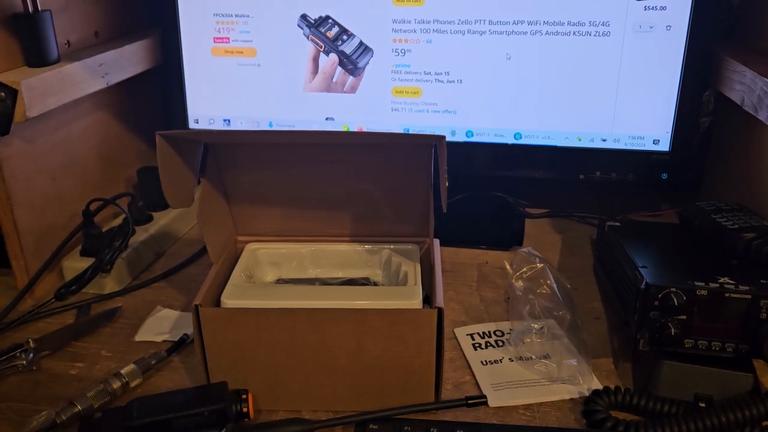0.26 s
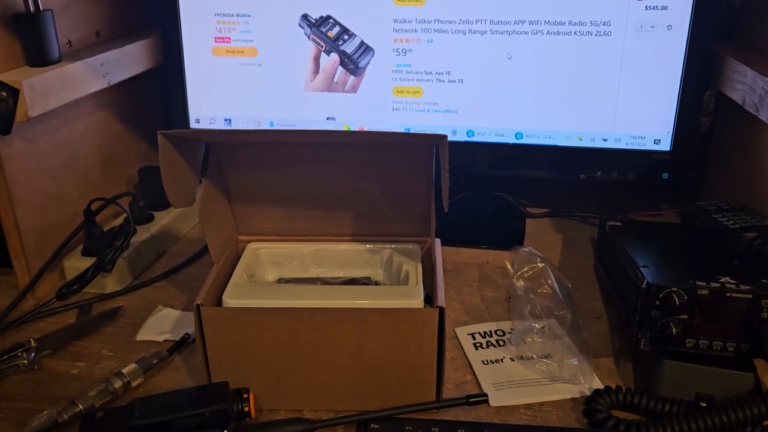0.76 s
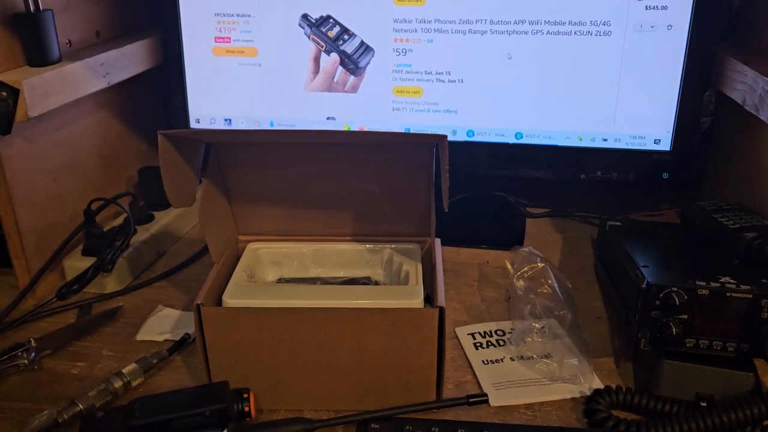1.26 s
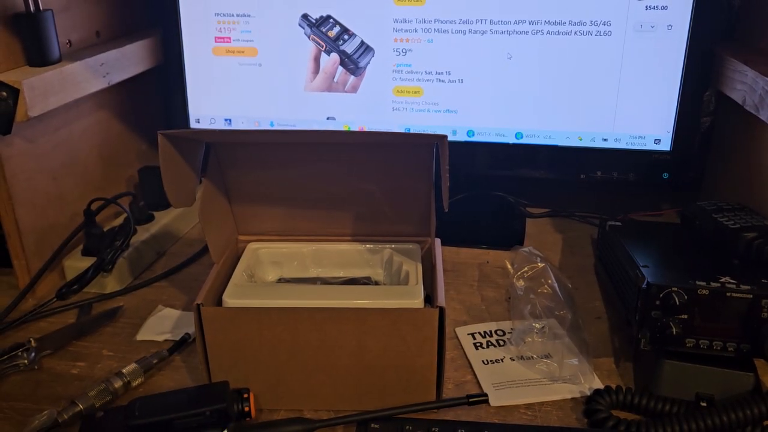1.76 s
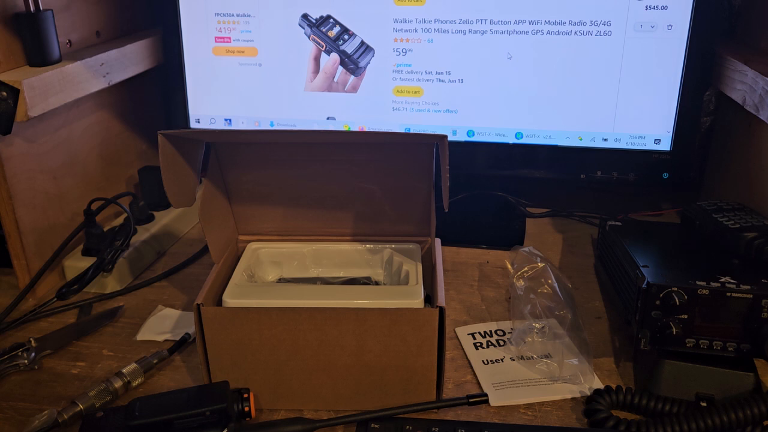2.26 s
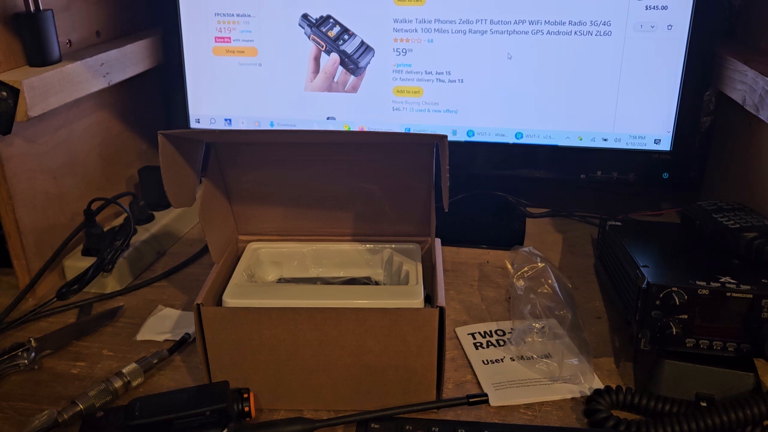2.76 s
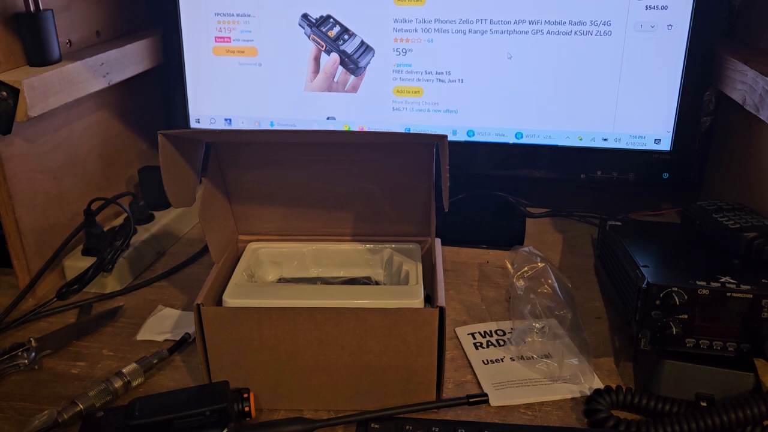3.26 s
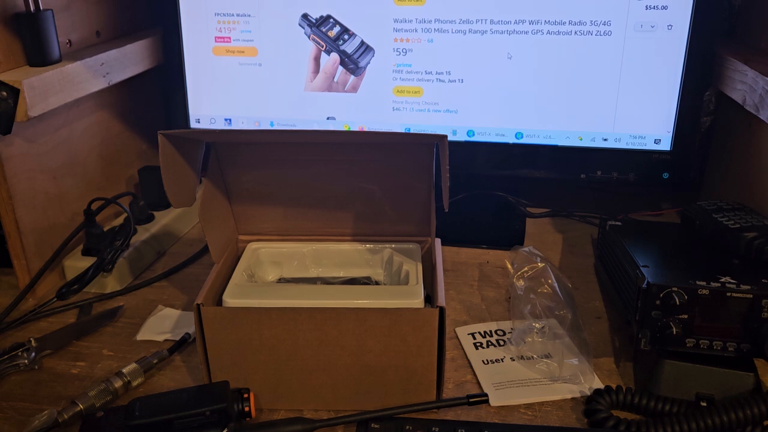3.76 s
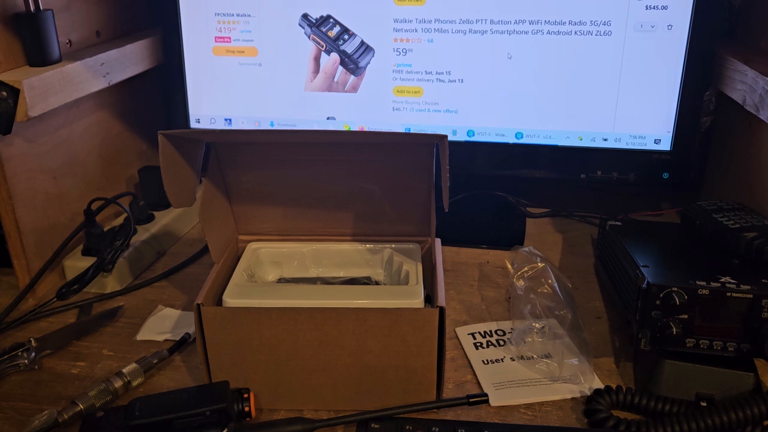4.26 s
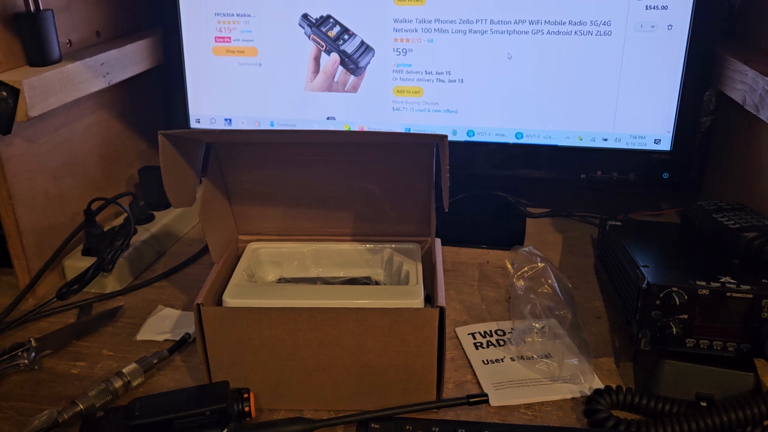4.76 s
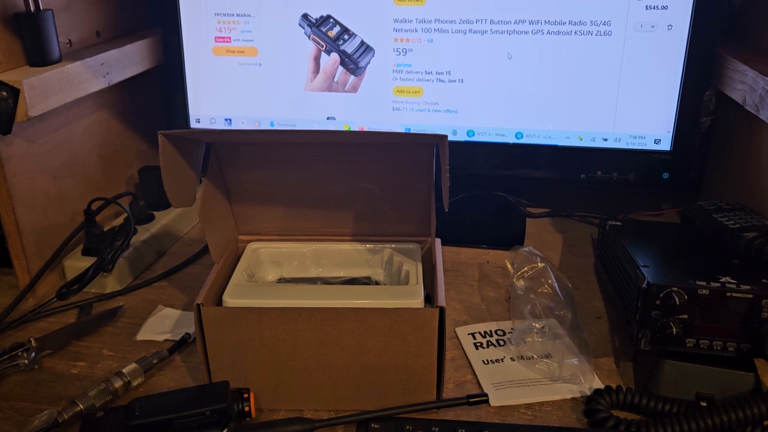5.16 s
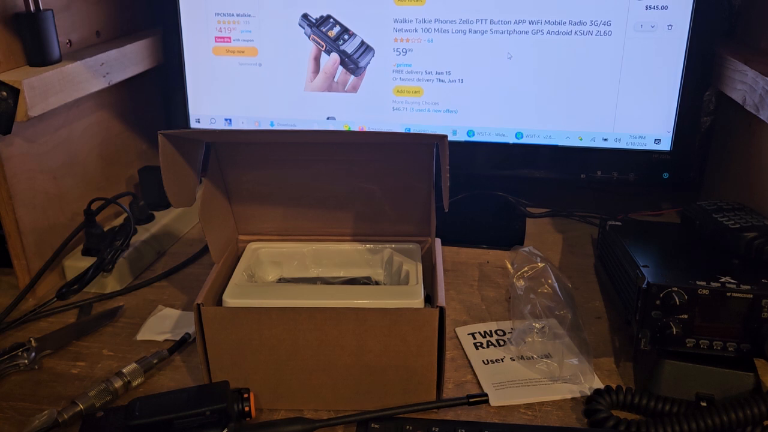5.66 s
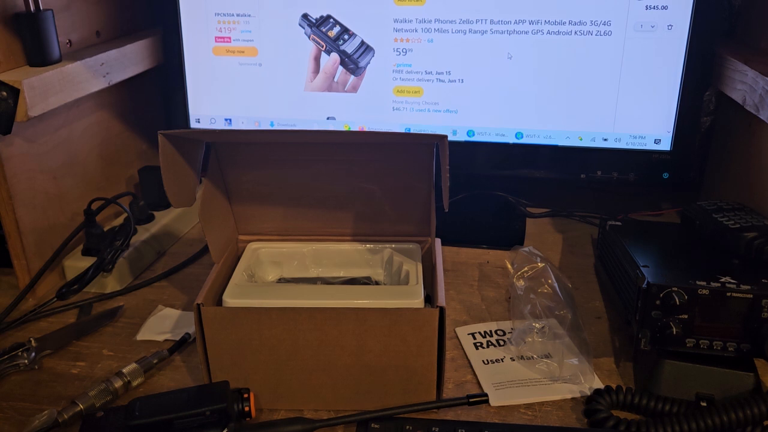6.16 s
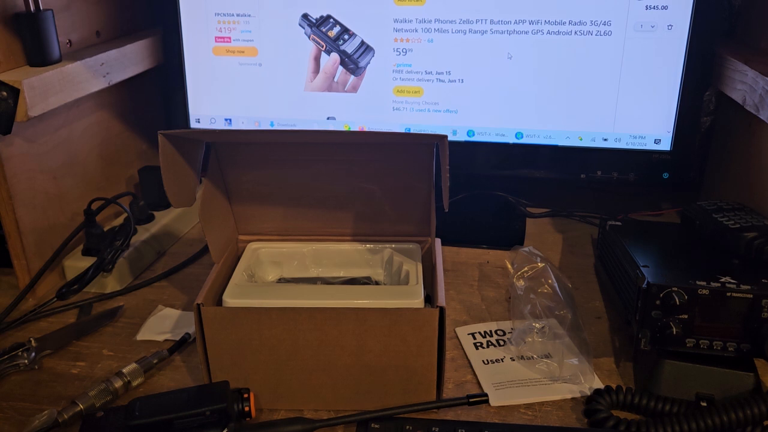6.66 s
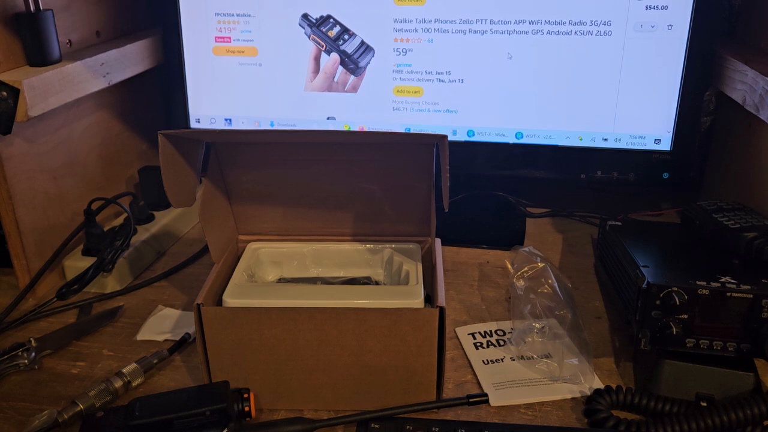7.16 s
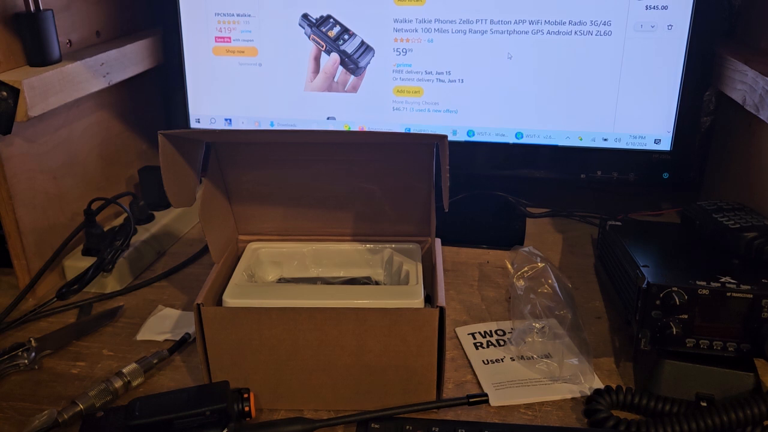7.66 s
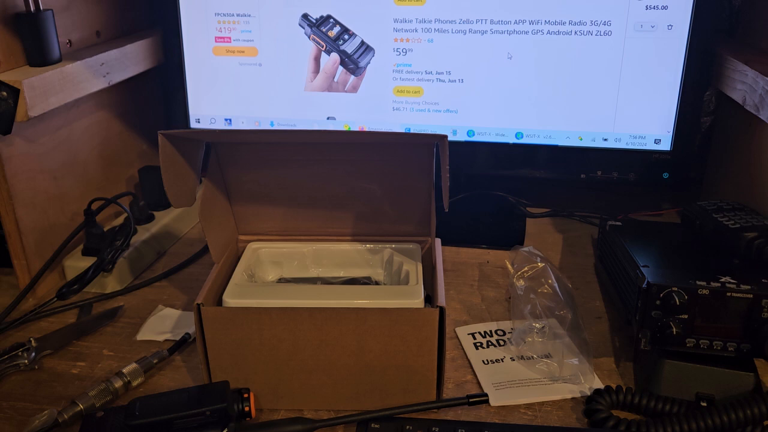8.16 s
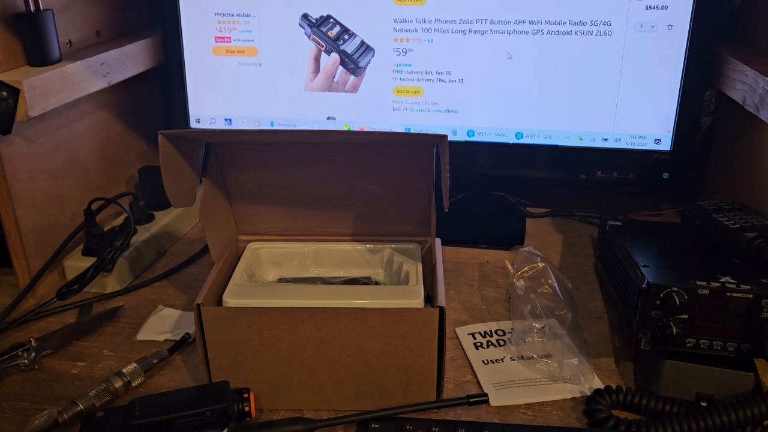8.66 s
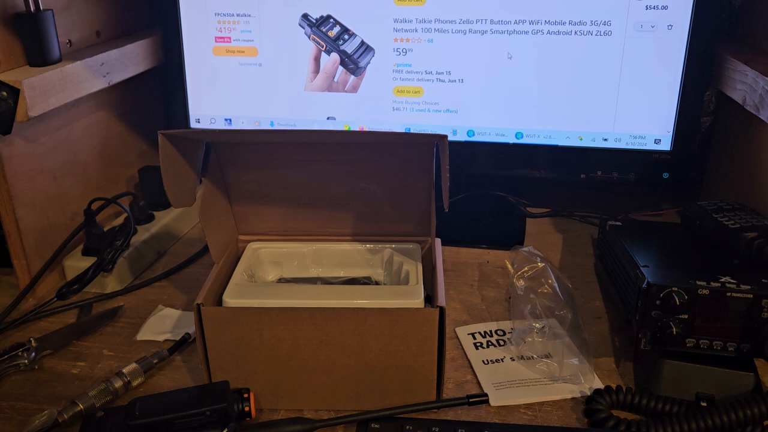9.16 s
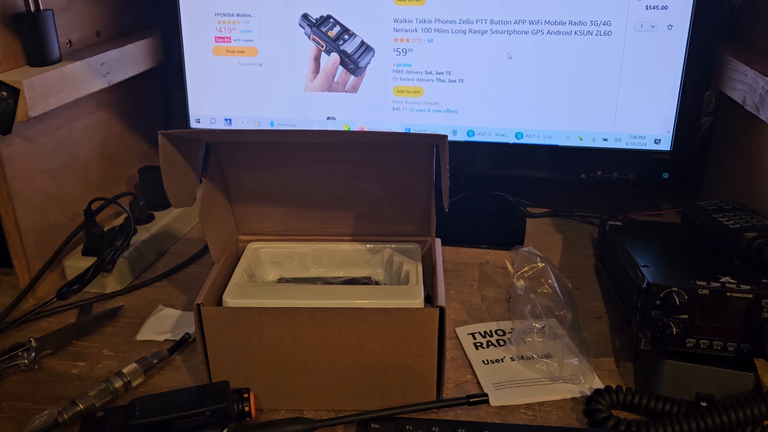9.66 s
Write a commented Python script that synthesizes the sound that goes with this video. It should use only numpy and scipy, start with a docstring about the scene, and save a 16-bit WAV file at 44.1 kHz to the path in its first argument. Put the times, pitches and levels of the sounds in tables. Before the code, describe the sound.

Quiet indoor desk ambience: deep fan drone, faint blade whine and rushing air, broken by a tiny early snap with quick rebounds and barely audible ticks.

```python
"""A quiet small room with a computer running, heard at two microphone ports over the desk.
Throughout, two unbalanced fans and a transformer hum through the furniture, blades whine, coils whistle
faintly, and turbulent air excites the room's resonances and thins out into hiss.
Near the start a small part snaps and rebounds, as a fast-rising noise burst with ringing modes.
A faint tick follows, then a soft rustle of swelling noise, and near the end another tick."""
import sys
import numpy as np
from scipy import signal
from scipy.fft import rfft, irfft
from scipy.io import wavfile

SR = 44100
rng = np.random.default_rng(int(sys.argv[2]) if len(sys.argv) > 2 else 0)


def to_wav(s):
    """Save 16-bit WAV."""
    ch = np.atleast_2d(s).T  # columns
    pcm = np.round(np.clip(ch, -1, 1) * 32767)  # PCM
    wavfile.write(sys.argv[1], SR, pcm.astype(np.int16))


N = 437472

# Pan is left minus right throughout.
# Whistle of the power supply's coils: frequency_hz, level_db, pan_db
COIL_TONES = [(6364, -87, 7), (6380, -90, -6)]
# Clicks nearby, a snap with its rebounds and two later ticks: start_s, level_db, brightness_db_per_octave
CLICK_EVENTS = [(0.3245, -38, -1), (0.3328, -47, -3), (0.367, -52, -4), (0.42, -48, -4), (1.318, -64, 14),
                (9.366, -58, 2)]
# Relative spectrum of a contact sound: frequency_hz, density_db_per_hz
CONTACT_SPECTRUM = [(300, -9), (1500, 1.5), (2500, -4.5), (3300, -0.5), (4300, 1), (7500, -9.5),
                    (12000, -14), (15500, -20)]
# Modes of the snapping part, relative to the click: frequency_hz, level_db
SNAP_MODES = [(1420, -15), (3180, -14), (3850, -14), (4500, -13), (5350, -16)]
# Seven blades and motor of the fast fan: multiple_of_turning_rate, level_db, pan_db
BLADE_TONES = [(7, -56.5, 1.5), (14, -63.5, -0.5), (17, -76.5, 13), (20, -80.5, 5), (22, -75, 12),
               (24, -79.5, 15), (25, -77, 3), (28, -84, 2), (29, -78, 18)]
# Rush of the fans' air, before the resonances: frequency_hz, density_db_per_hz
AIR_SPECTRUM = [(10, -100), (30, -77), (55, -68.5), (85, -78), (130, -74), (280, -78), (520, -84),
                (800, -85.5), (1000, -86), (1500, -89), (2600, -93.5), (4000, -95.5), (6000, -100.5),
                (15500, -118.5)]
# Resonances of room, desk and case that lift the rush: frequency_hz, width_hz, lift_db
ROOM_RESONANCES = [(140, 11, 1), (165.3, 19, 8), (184.6, 8, 3.5), (228, 13, 5), (312.3, 25.6, 7.5),
                   (340, 16, 7.5), (369.7, 26, 8), (404, 19, 8.5), (457, 42, 6), (535, 31, 3),
                   (610, 23, 4.5), (679, 46, 5.5), (774, 136, 4), (1268, 80, 5.5), (1450, 116, 4),
                   (2172, 205, 4.5), (3070, 250, 3), (3490, 200, 2)]
# Likeness of the rush at the two ports: frequency_hz, correlation
PORT_CORRELATION = [(100, 0.94), (350, 0.92), (480, 0.77), (700, 0.38), (1200, 0.14), (2200, 0.23),
                    (4000, -0.1), (12000, -0.013)]
# Balance of the rush between the ports: frequency_hz, pan_db
AIR_PAN = [(60, -1.5), (110, -2), (200, 4), (380, -0.5), (700, 1), (1290, 2), (2380, 2), (4400, 1.5),
           (8120, 0), (15000, -3.5)]
# Fast fan's shaft shaking the case: multiple_of_turning_rate, level_db
FAST_SHAFT_LINES = [(1, -35.5)]
# Slow fan with four blades: multiple_of_turning_rate, level_db
SLOW_FAN_LINES = [(1, -43), (2, -53.5), (4, -48), (8, -65), (16, -70)]
# Transformer hum: multiple_of_mains_rate, level_db
TRANSFORMER_LINES = [(4, -59.5)]
# Cavities of the microphone ports: frequency_hz, width_hz, gain_db
PORT_CAVITIES = [(7750, 1660, 5), (9700, 940, -9), (12100, 1540, 6)]

FAST_HZ, SLOW_HZ, MAINS_HZ = 57.9, 27.07, 60
HUM_PAN_DB, HUM_LAG_RAD = .85, .13  # left minus right, lag of the left port
AIR_SWELL_DB_PER_S = 0.07
CLICK_ATTACK_S, CLICK_T60_S, RING_T60_S = 0.0005, 0.066, .075
RUSTLE_CENTRE_S, RUSTLE_SIGMA_S = 4.705, .03
RUSTLE_DB, RUSTLE_TILT_DB_PER_OCTAVE = -64, 5
TOP_HZ = 15700
TIME = np.arange(N) / SR  # seconds
BINS = np.maximum(np.arange(N // 2 + 1) * SR / N, 1)  # Hz
LEFT_RIGHT = np.array([[.5], [-.5]])  # splits a difference evenly between the ports


def undb(db):
    """Amplitude is an exponential function of level in decibels."""
    return 10 ** (np.asarray(db) / 20)


def curve(points):
    """Spectral values are interpolated linearly on a log-frequency axis."""
    hz, value = np.transpose(points)
    return np.interp(np.log(BINS), np.log(hz), value)


def bells(rows):
    """Resonances and dips superpose in dB, each a Gaussian with its full width at half height."""
    return sum(db * .5 ** ((2 * (BINS - hz) / width) ** 2) for hz, width, db in rows)


def colour(x, db):
    """Linear filtering multiplies the spectrum by a gain at every frequency."""
    return irfft(rfft(x) * undb(db), N)


def walk(rate):
    """Low-passed noise wanders smoothly, with unit spread and about rate turns a second."""
    spectrum = rfft(rng.standard_normal(N))
    x = irfft(spectrum / (1 + (BINS / rate) ** 2) ** 2, N)
    return (x - x.mean()) / x.std()


def decay(age, t60):
    """Exponential decay loses 60 dB in t60 seconds."""
    return np.exp(-np.log(1000) * age / t60)


def rotation(hz, wander, rate):
    """A shaft's angle is the integral of its speed, which drifts by a small share at rate knots a second."""
    knots = rng.standard_normal(int(N / SR * rate) + 2)
    drift = np.interp(TIME * rate, np.arange(len(knots)), knots)
    return 2 * np.pi * np.cumsum(hz * (1 + wander * drift)) / SR


def tone(angle, multiple, db, port_phase=0):
    """A harmonic is phase-locked to its source; port_phase is the left port's lag in radians."""
    start_phase = rng.uniform(0, 2 * np.pi)
    amplitude = np.sqrt(2) * undb(db)  # db is an rms level
    return amplitude * np.sin(multiple * angle + start_phase - port_phase * LEFT_RIGHT)


def reflections(x, count=12):
    """Delayed copies interfere: desk, screen and shelves comb short waves differently at each port."""
    lag_s = rng.uniform(.001, .014, (count, 2, 1))
    share = .22 / (1 + (700 / BINS) ** 4)  # grows with frequency
    echoes = sum(np.exp(-2j * np.pi * BINS * lag) for lag in lag_s) / np.sqrt(count)
    return irfft(rfft(x) * (1 + share * echoes) / np.sqrt(1 + share ** 2), N)


def scatter(brightness_db):
    """Scattering from things on the desk decorrelates a contact's noise at the two ports, at unit level."""
    tilt_db = brightness_db * np.log2(1 + BINS / 1000)
    x = colour(rng.standard_normal((2, N)), curve(CONTACT_SPECTRUM) + tilt_db)
    return x / x.std()


def coils():
    """Steady oscillation of the power supply's coils radiates very faint high tones."""
    return sum(tone(2 * np.pi * hz * TIME, 1, db + pan_db * LEFT_RIGHT)
               for hz, db, pan_db in COIL_TONES)


def rustle():
    """High crinkling, perhaps plastic wrapping settling, is noise under a Gaussian envelope."""
    swell = np.exp(-.5 * ((TIME - RUSTLE_CENTRE_S) / RUSTLE_SIGMA_S) ** 2)
    return undb(RUSTLE_DB) * swell * scatter(RUSTLE_TILT_DB_PER_OCTAVE)


def clicks(room_db=-13, room_t60=0.29, pan_db=3.0):
    """An impact excites damped modes and a noise burst, which leaves a short reverberant tail."""
    out = 0
    for start_s, db, brightness_db in CLICK_EVENTS:
        age = np.maximum(TIME - start_s, 0)
        rise = 1 - np.exp(-age / CLICK_ATTACK_S)
        direct = decay(age, CLICK_T60_S)
        tail = undb(room_db) * decay(age, room_t60)
        burst = np.hypot(direct, tail) * scatter(brightness_db)
        modes = sum(tone(2 * np.pi * hz * age, 1, mode_db) for hz, mode_db in SNAP_MODES)
        ring = modes * decay(age, RING_T60_S)
        out = out + undb(db) * rise * (burst + ring)
    return out * undb(pan_db * LEFT_RIGHT)


def whine(flutter_db=2):
    """Blades cutting uneven air radiate harmonics of the turning rate, fluttering in pitch and strength."""
    angle = rotation(FAST_HZ, wander=.0016, rate=20)
    return sum(tone(angle, multiple, db + flutter_db * walk(10.5)) * undb(pan_db * LEFT_RIGHT)
               for multiple, db, pan_db in BLADE_TONES)


def rush():
    """Turbulence excites room resonances; its field is coherent at the ports in the bass, diffuse above."""
    mid, side = rfft(rng.standard_normal((2, N)))
    alike = np.clip(curve(PORT_CORRELATION), -.999, .999)
    # Mid and side weights set the correlation while each port keeps unit power.
    common = mid * np.sqrt((1 + alike) / 2)
    opposed = 2 * LEFT_RIGHT * side * np.sqrt((1 - alike) / 2)
    air = irfft(common + opposed, N) * np.sqrt(SR / 2)  # unit power per Hz
    db = curve(AIR_SPECTRUM) + bells(ROOM_RESONANCES) + curve(AIR_PAN) * LEFT_RIGHT
    swell_db = AIR_SWELL_DB_PER_S * (TIME - TIME.mean())
    return reflections(colour(air, db)) * undb(swell_db)


def hum(sway_db=0.36):
    """Forced vibration of the desk radiates long waves, nearly alike at both ports; close lines beat."""
    fast = rotation(FAST_HZ, wander=0.00029, rate=0.79)
    slow = rotation(SLOW_HZ, wander=0.00065, rate=0.99)
    mains = 2 * np.pi * MAINS_HZ * TIME
    parts = [(fast, FAST_SHAFT_LINES), (slow, SLOW_FAN_LINES), (mains, TRANSFORMER_LINES)]
    lines = sum(tone(angle, multiple, db, HUM_LAG_RAD)
                for angle, table in parts for multiple, db in table)
    return lines * undb(sway_db * walk(2) + HUM_PAN_DB * LEFT_RIGHT)


def scene():
    """Superposition: the pressures of all sources add."""
    return coils() + rustle() + clicks() + whine() + rush() + hum()


def record(dry):
    """Cavity resonance in the microphone ports colours the treble, and a steep low-pass cuts the top."""
    coloured = colour(dry, bells(PORT_CAVITIES))
    low_pass = signal.ellip(12, .1, 90, TOP_HZ, fs=SR, output="sos")
    return signal.sosfilt(low_pass, coloured)


dry = scene()
out = record(dry)
to_wav(out)
```